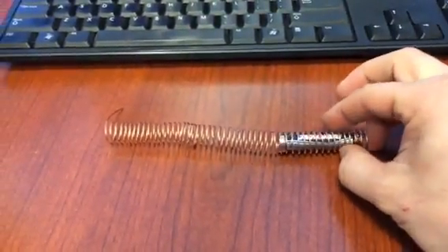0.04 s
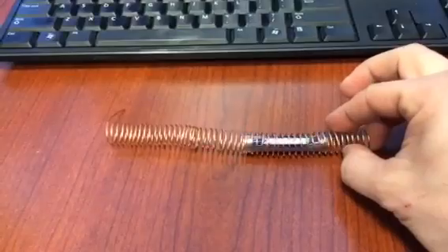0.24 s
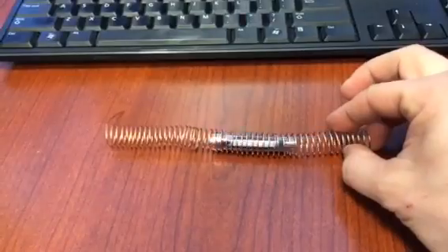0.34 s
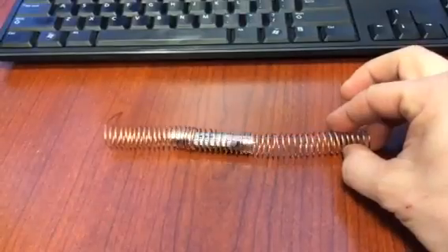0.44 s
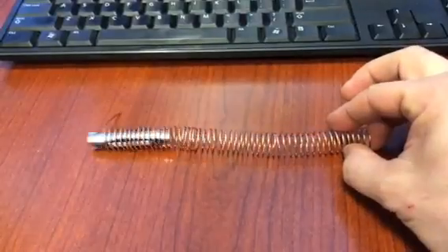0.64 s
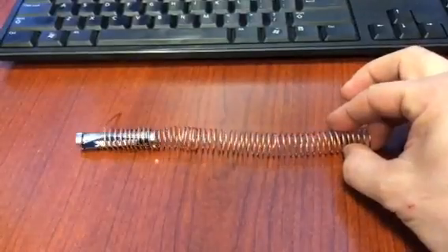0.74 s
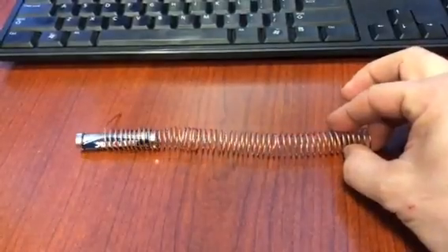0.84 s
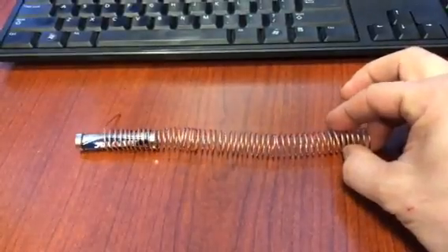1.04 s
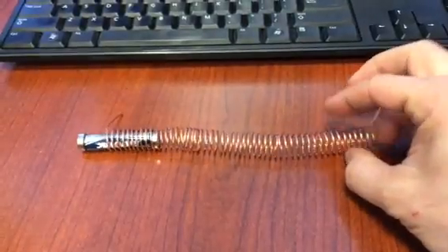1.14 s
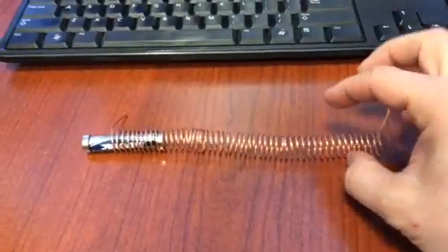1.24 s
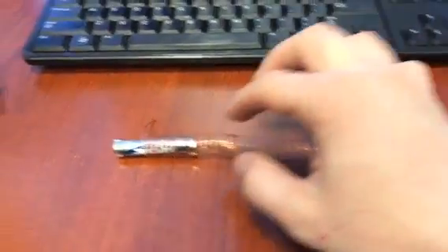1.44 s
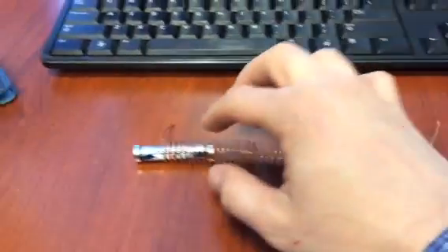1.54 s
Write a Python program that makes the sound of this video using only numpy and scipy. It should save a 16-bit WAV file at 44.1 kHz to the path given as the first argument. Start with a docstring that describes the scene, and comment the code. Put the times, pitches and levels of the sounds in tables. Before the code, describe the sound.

Quick metallic rattle and scrape of a battery sliding through a wire coil on a desk.

```python
"""A battery capped with magnets drives itself through a copper coil lying on a wooden desk.
Sliding friction makes the magnets scrape and tick over the turns, while impacts excite the coil's
resonances: it shivers, chatters and knocks on the desk until the battery clacks to a stop at the
far end. Fingers then let go of the wire and the hand shifts on the desk, in a small quiet room."""
import sys
import numpy as np
from scipy import signal
from scipy.fft import rfft, irfft
from scipy.io import wavfile
from scipy.ndimage import uniform_filter1d

SR = 44100
rng = np.random.default_rng(int(sys.argv[2]) if len(sys.argv) > 2 else 0)


def output_pcm(signal):
    """Save a mono or channel-first signal as 16-bit PCM at the path in sys.argv[1].

    Samples are clipped to [-1, 1] before scaling.
    """
    pcm = np.clip(np.atleast_2d(signal).T, -1, 1) * 32767
    wavfile.write(sys.argv[1], SR, np.round(pcm).astype(np.int16))


N = 70560
T = np.arange(N) / SR


def amp(db):
    """Amplitude ratio of a level in decibels."""
    return 10 ** (np.asarray(db) / 20)


def unit_rms(x):
    """Normalisation to an rms of one."""
    return x / np.sqrt(np.mean(x ** 2) + 1e-20)


def envelope(points):
    """Amplitude envelope through (time_s, level_db) points, silent outside them."""
    times, db = np.transpose(points)
    return amp(np.interp(T, times, db)) * (T > times[0]) * (T < times[-1])


def at_frequency(points, hz):
    """Interpolation on a logarithmic frequency axis."""
    freqs, values = np.transpose(points)
    return np.interp(np.log(hz + 1), np.log(freqs), values)


def colour(x, spectrum):
    """Spectral shaping by a minimum-phase filter of unit energy."""
    size = 4096
    log_gain = np.log(amp(at_frequency(spectrum, abs(np.fft.fftfreq(size, 1 / SR)))))
    response = np.exp(np.conj(signal.hilbert(log_gain)))
    taps = np.fft.ifft(response).real[:size // 2]
    return signal.fftconvolve(x, taps / np.linalg.norm(taps))[:N]


def burst(start_s, decay_s):
    """Transient excitation: white noise with exponential decay."""
    return (T >= start_s) * np.exp(-abs(T - start_s) / decay_s) * rng.standard_normal(N)


def contacts(rate_per_s, spread_db, flutter_db, flutter_s=.007):
    """Shot noise: tiny random impacts of uneven size, whose strength varies in clumps."""
    sizes = amp(spread_db * np.minimum(rng.exponential(1, N), 4))
    clumps = unit_rms(uniform_filter1d(rng.standard_normal(N), int(flutter_s * SR)))
    impulses = rng.choice([-1, 1], N) * (rng.random(N) < rate_per_s / SR)
    return unit_rms(sizes * impulses * amp(flutter_db * clumps))


# Room rumble and hiss: frequency_hz, relative_db
AIR_SPECTRUM = [(12, -37), (20, -21), (38, -10.5), (118, -3), (147, -8.5), (217, -7), (409, -19.5),
                (555, -20.5), (796, -23.5), (865, -21.5), (994, -27), (1510, -27), (4560, -39),
                (15000, -40)]
# Mains hum and a thin electrical whine: pitch_hz, rms_db
ELECTRICAL_TONES = [(119.5, -72), (14551, -87.5)]

def background(air_db=-62):
    """Stationary noise floor: broadband rumble and hiss with two pure tones."""
    gain = amp(at_frequency(AIR_SPECTRUM, np.fft.rfftfreq(N, 1 / SR)))
    air = irfft(rfft(rng.standard_normal(N)) * gain, N)
    tones = sum(amp(db) * np.sqrt(2) * np.sin(2 * np.pi * (hz * T + rng.random()))
                for hz, db in ELECTRICAL_TONES)
    return amp(air_db) * unit_rms(air) + tones


# Reverberation time of the room: frequency_hz, t60_s
ROOM_DECAY = [(200, 0.47), (1500, 0.23), (5000, 0.2), (14000, 0.11)]

def reverberation(x, level_db=-12.5, delay_s=.005):
    """A diffuse field decays exponentially, the treble fastest."""
    hz, t, noise = signal.stft(rng.standard_normal(SR // 2), SR, nperseg=256)
    decay = np.exp(-np.log(1000) * t / at_frequency(ROOM_DECAY, hz)[:, None])
    tail = signal.istft(noise * decay, SR)[1]
    tail *= T[:len(tail)] > delay_s
    return amp(level_db) * signal.fftconvolve(x, tail / np.linalg.norm(tail))[:N]


# Soft bumps of hand and battery on the desk: start_s, level_db, pitch_hz
DESK_BUMPS = [(0.16, -44.5, 152.6), (0.272, -48, 127), (0.469, -43, 139), (.697, -48.5, 135),
              (1.512, -47.5, 213), (1.569, -50, 163)]

def desk_bumps(rise_s=.004, decay_s=.015):
    """The desk top answers each bump as a heavily damped oscillator, with a dull thud."""
    thuds = np.zeros(N)
    for start, db, hz in DESK_BUMPS:
        t = np.maximum(T - start, 0)
        swell = 1 - np.exp(-t / rise_s)
        thuds += amp(db) * swell * np.exp(-t / decay_s) * np.sin(2 * np.pi * hz * t)
    return thuds


# Broad response of the coil: frequency_hz, relative_db
COIL_SPECTRUM = [(60, -21), (200, -8), (420, -19.5), (600, -14.5), (1250, -16), (1900, -11), (2800, -27.5),
                 (4000, -36.5), (12000, -46)]
# Resonances of the coil on the desk: pitch_hz, bandwidth_hz, relative_db
COIL_MODES = [(587, 29, -9), (990, 54, -14.5), (1484, 77, -4), (1595, 114, 3), (1820, 50, -25),
              (2023, 45, -11.5), (2408, 87, -9), (3004, 29, -10.5), (3170, 37, -18), (3880, 54, -26)]

def coil_resonance(force):
    """Modal superposition: a force excites narrow resonances on top of a broad response."""
    t = T[:N // 8]
    body = colour(signal.unit_impulse(N), COIL_SPECTRUM)[:len(t)]
    response = body / abs(rfft(body)).max() * amp(max(db for hz, db in COIL_SPECTRUM))
    for k, (hz, width, db) in enumerate(COIL_MODES):
        decay = 2 * np.pi * width / SR * np.exp(-np.pi * width * t)
        response += (-1) ** k * amp(db) * decay * np.sin(2 * np.pi * hz * t)
    return signal.fftconvolve(force, response / np.linalg.norm(response))[:N]


# Fingers brushing the wire as they let go: start_s, ring_db, rasp_db, decay_s
FINGER_BRUSHES = [(1.189, -64, -75, 0.021), (1.214, -69, -72.5, 0.05), (1.283, -78, -73, .008),
                  (1.3557, -61.5, -63.5, 0.016), (1.382, -61, -73, .005)]
# The hand sliding over the desk: time_s, level_db
HAND_LEVEL = [(1.42, -87), (1.51, -74), (1.54, -76.5), (1.61, -77)]
# Rubbing skin: frequency_hz, relative_db
SKIN_SPECTRUM = [(250, 4), (700, -5), (1600, -1.5), (3300, -6.5), (4600, -1.5), (7000, -6.5), (10000, -11),
                 (15000, -17)]

def fingers(rise_s=.0018):
    """Skin friction: fingertips slip off the wire, which rings faintly, then the hand rubs the desk."""
    plucks = np.zeros(N)
    skin = envelope(HAND_LEVEL) * rng.standard_normal(N)
    for start, ring_db, rasp_db, decay_s in FINGER_BRUSHES:
        rub = np.clip((T - start) / rise_s, 0, 1) * burst(start, decay_s)
        plucks += amp(ring_db) * rub
        skin += amp(rasp_db) * rub
    return coil_resonance(plucks) + colour(skin, SKIN_SPECTRUM)


# Loose turns chattering: time_s, level_db
CHATTER_LEVEL = [(.14, -82), (.182, -66), (.21, -78), (.38, -64), (.5, -54.5), (.68, -54), (.735, -50.5),
                 (.762, -51), (.78, -53), (.828, -57.5), (.865, -95)]
# Timbre of the chatter: frequency_hz, relative_db
CHATTER_SPECTRUM = [(100, -30), (470, -25.5), (580, 1.5), (780, -7.5), (1020, 4), (1300, -1.5), (1600, 7.5),
                    (2050, -4.5), (2500, -4.5), (3300, -18), (5000, -20.5), (12000, -36)]

def coil_chatter():
    """Intermittent contact: loose turns tap the desk as the coil stretches and settles."""
    taps = contacts(rate_per_s=1500, spread_db=.5, flutter_db=2.5)
    return colour(envelope(CHATTER_LEVEL) * taps, CHATTER_SPECTRUM)


# Shivering of the coil: time_s, level_db
SHIVER_LEVEL = [(.165, -88), (.19, -68), (.21, -61), (.25, -54), (.32, -49), (.36, -52), (.43, -49),
                (.52, -47.5), (.6, -47.5), (.68, -46), (.725, -45.5), (.76, -52.5), (.785, -68),
                (.825, -58.5), (.86, -101)]

def coil_shiver():
    """Forced vibration: dense small impacts keep the coil's modes ringing."""
    rattle = contacts(rate_per_s=2500, spread_db=.5, flutter_db=3)
    return coil_resonance(envelope(SHIVER_LEVEL) * rattle)


# The coil knocking on the desk: start_s, level_db, click_emphasis_db
COIL_KNOCKS = [(0.1913, -45.5, -21), (0.2243, -28.5, -2), (0.2399, -47, -4), (.337, -44, -2),
               (.4163, -30.5, 3), (0.4597, -33, 2.5), (0.4864, -32, -4), (0.5374, -34, -9),
               (0.5623, -33, 8), (.595, -45.5, 9), (.7162, -38.5, 14.5), (.824, -64, 5), (1.234, -63, -12)]
# Modes of coil and desk under a knock: pitch_hz, relative_db, t60_s
IMPACT_MODES = [(592, -17, 0.027), (687, -13.5, .05), (860, -15, 0.054), (1011.6, -4, 0.042),
                (1108, -10.5, 0.045), (1235, -11.5, 0.054), (1483, -5, 0.03), (1647, -0.5, 0.037),
                (1845, -14, 0.045), (2254, -14.5, 0.042), (2636, -15.5, 0.033), (3270, -17.5, 0.022),
                (3980, -23, 0.026), (5490, -7.5, 0.015), (7480, -8.5, 0.014)]
# Contact click: frequency_hz, relative_db
CLICK_SPECTRUM = [(400, -12), (900, -2.5), (2700, 3), (5500, -4), (9000, -29), (15000, -18)]

def coil_knocks(rise_s=.00087, stagger_s=.0015, detune=.0049, click_db=-10):
    """Impact excitation: a short click, then modes that swell quickly and decay freely."""
    rings, clicks = np.zeros(N), np.zeros(N)
    for start, db, emphasis_db in COIL_KNOCKS:
        clicks += amp(db + emphasis_db + click_db) * burst(start, decay_s=.0031)
        for k, (hz, mode_db, t60) in enumerate(IMPACT_MODES):
            t = np.maximum(T - start - stagger_s * rng.random(), 0)
            shape = (1 - np.exp(-t / rise_s)) * np.exp(-np.log(1000) * t / t60)
            pitch = hz * (1 + detune * rng.standard_normal())
            rings += (-1) ** k * amp(db + mode_db) * shape * np.sin(2 * np.pi * pitch * t)
    return rings + colour(clicks, CLICK_SPECTRUM)


# The battery's clack against the last turn: pitch_hz, level_db, t60_s
CLACK_MODES = [(1975, -36.5, 0.028), (2448, -35.5, 0.038), (2590, -35, 0.029), (2920, -46, 0.0095),
               (5270, -39, 0.017)]

def battery_stop(start_s=.7162):
    """Damped free vibration: bright modes ring as the battery is caught at the end of the coil."""
    t = np.maximum(T - start_s, 0)
    return sum(amp(db) * np.exp(-np.log(1000) * t / t60) * np.sin(2 * np.pi * hz * t)
               for hz, db, t60 in CLACK_MODES)


# A magnet's rim catching on a turn: start_s, level_db
RIM_TICKS = [(0.1906, -60), (.2197, -48), (0.2385, -51), (.266, -52), (0.2817, -44), (0.318, -47.5),
             (.395, -40), (.423, -45), (0.46, -49), (.5245, -40), (.534, -45), (0.642, -36.5), (0.69, -42),
             (0.7008, -36.5), (0.7558, -50), (0.782, -56)]
# Timbre of a tick: frequency_hz, relative_db
TICK_SPECTRUM = [(400, -23), (1600, -2), (4000, -5.5), (7500, 4), (9000, -2), (12000, -4), (14500, -5.5)]

def magnet_ticks():
    """A brief contact has a broad spectrum: each catch of the rim gives a bright tick."""
    catches = sum(amp(db) * burst(start, decay_s=.0045) for start, db in RIM_TICKS)
    return colour(catches, TICK_SPECTRUM)


# Magnets scraping over the turns: time_s, level_db
SCRAPE_LEVEL = [(.17, -85), (.2, -65), (.25, -61.5), (.29, -51.5), (.34, -56.5), (.38, -54.5), (.4, -49),
                (.45, -47.5), (.505, -50), (.55, -48), (.585, -50), (.65, -46), (.712, -42.5), (.737, -56),
                (.78, -78), (.85, -85)]
# Thin resonances of the scraped wire: pitch_hz, bandwidth_hz, relative_db
WIRE_MODES = [(5315, 20, 4.5), (6680, 51, 1), (7390, 27, -11)]
# Timbre of the scrape: frequency_hz, relative_db
SCRAPE_SPECTRUM = [(200, -22.5), (450, -19), (620, -7), (2500, -2), (4100, -3.5), (5200, -2), (6300, -2),
                   (7800, 3), (8500, -4.5), (10000, -3.5), (12000, -8.5), (15000, -13)]

def magnet_scrape():
    """Sliding friction: microscopic impacts make a hiss and excite the wire's high modes."""
    friction = envelope(SCRAPE_LEVEL) * contacts(rate_per_s=9000, spread_db=3.5, flutter_db=1.5)
    t = T[:N // 8]
    wire = np.zeros(len(t))
    for hz, width, db in WIRE_MODES:
        decay = 2 * np.pi * width / SR * np.exp(-np.pi * width * t)
        wire += amp(db) * decay * np.cos(2 * np.pi * hz * t)
    ringing = signal.fftconvolve(friction, wire)[:N]
    return colour(friction + ringing, SCRAPE_SPECTRUM)


def scene():
    """Superposition of direct sound, reverberation and noise floor, in mono."""
    travel = magnet_scrape() + coil_shiver() + coil_chatter() + magnet_ticks() + coil_knocks()
    direct = travel + battery_stop() + fingers() + desk_bumps()
    return (direct + reverberation(direct) + background())[None]


def record(dry):
    """Band limiting by a linear-phase low-pass filter."""
    cutoff_hz = 15350
    taps = signal.firwin(401, cutoff_hz, window=("kaiser", 8), fs=SR)
    return signal.oaconvolve(dry, taps[None], "same")


dry = scene()
out = record(dry)
output_pcm(out)
```